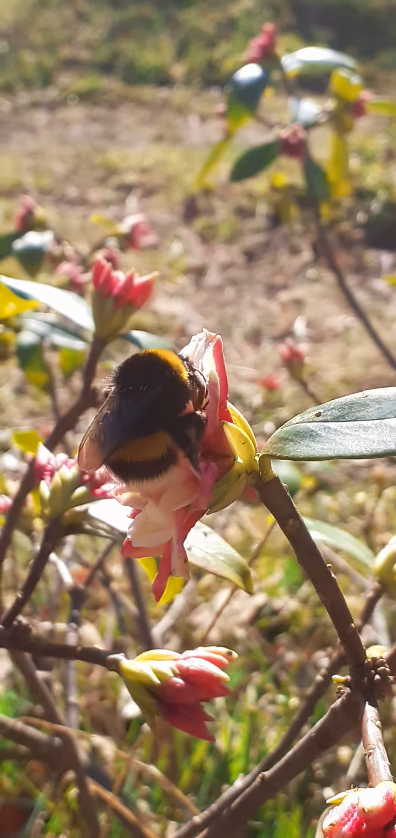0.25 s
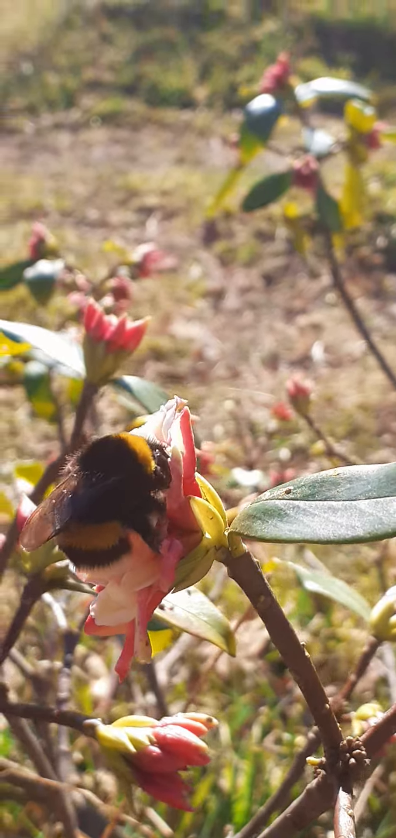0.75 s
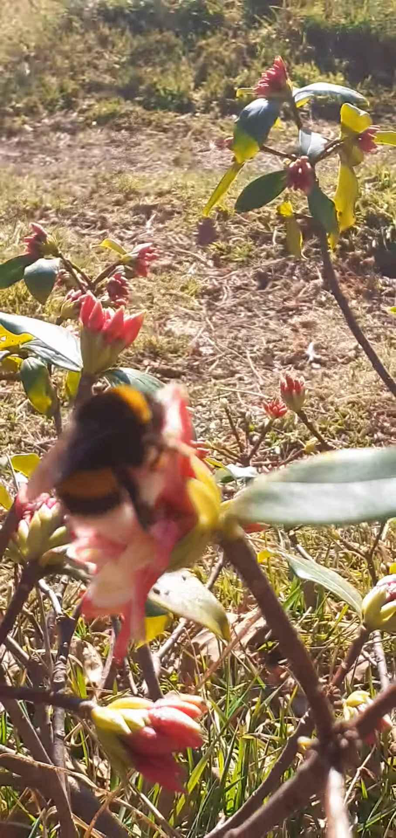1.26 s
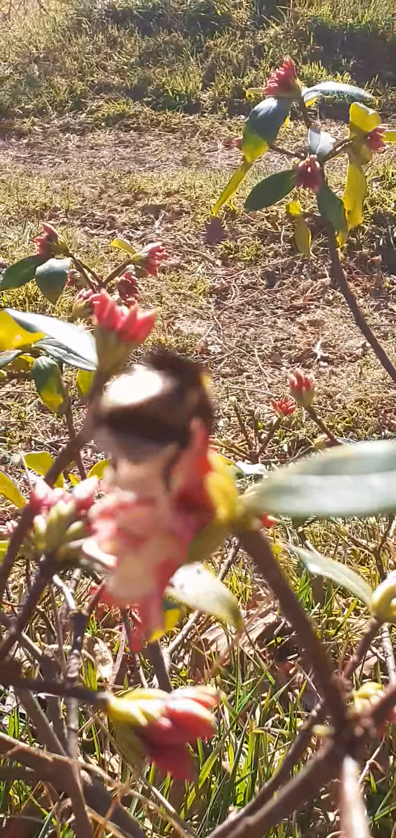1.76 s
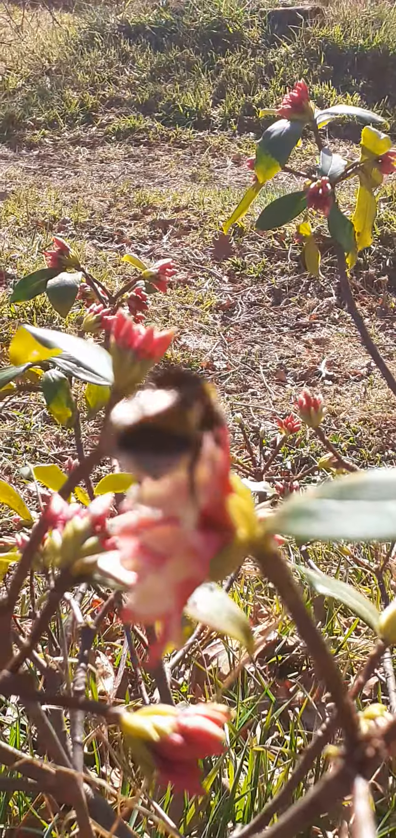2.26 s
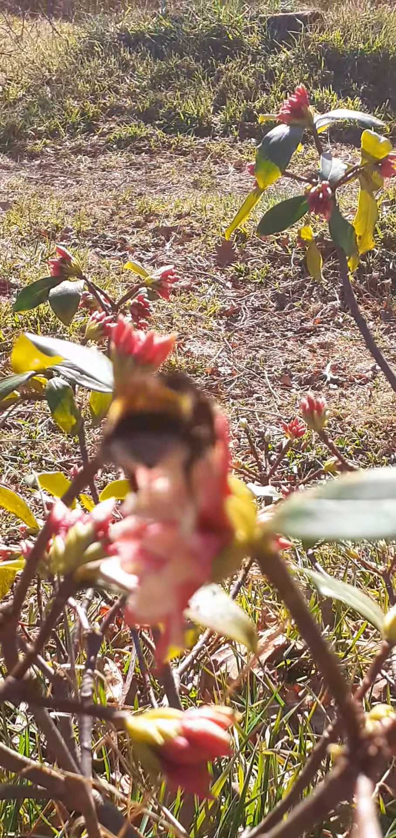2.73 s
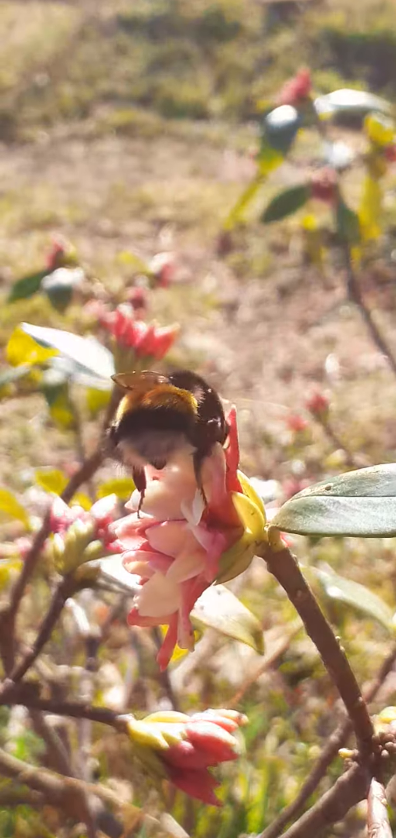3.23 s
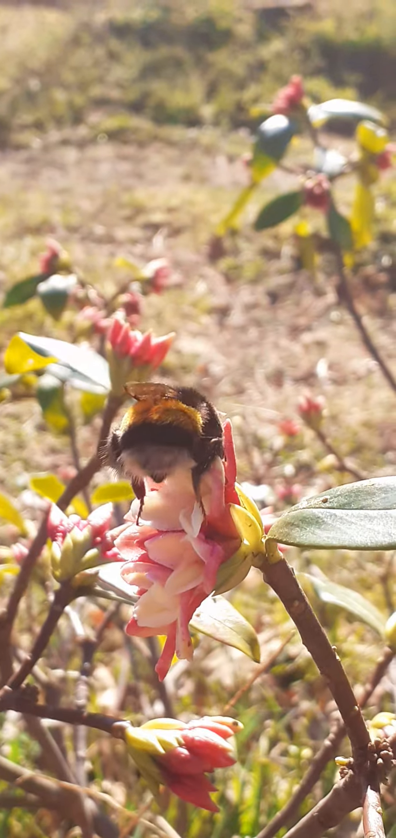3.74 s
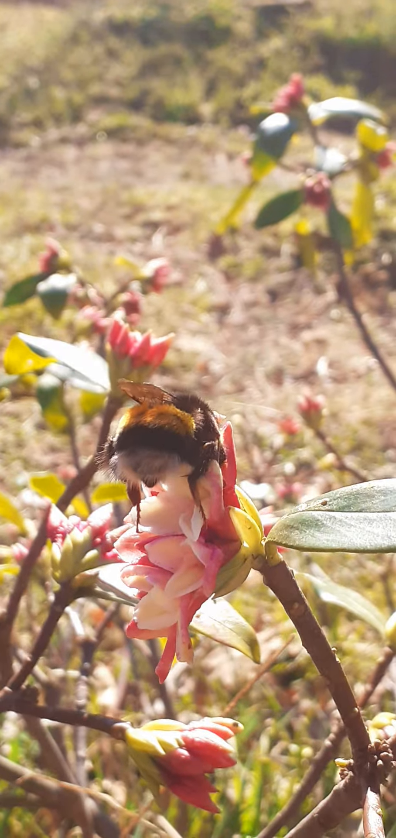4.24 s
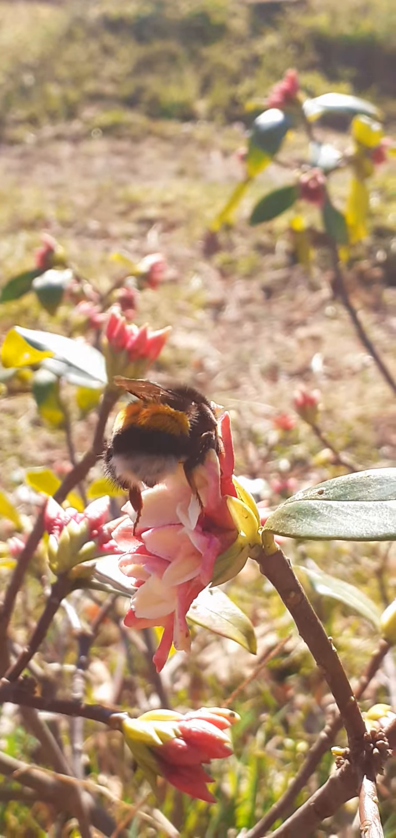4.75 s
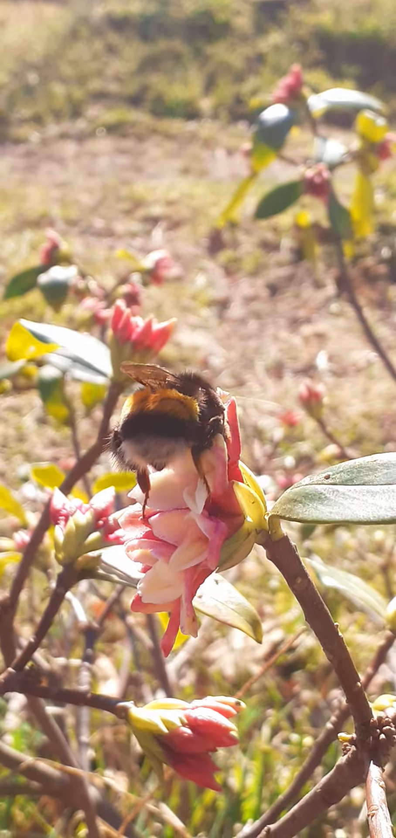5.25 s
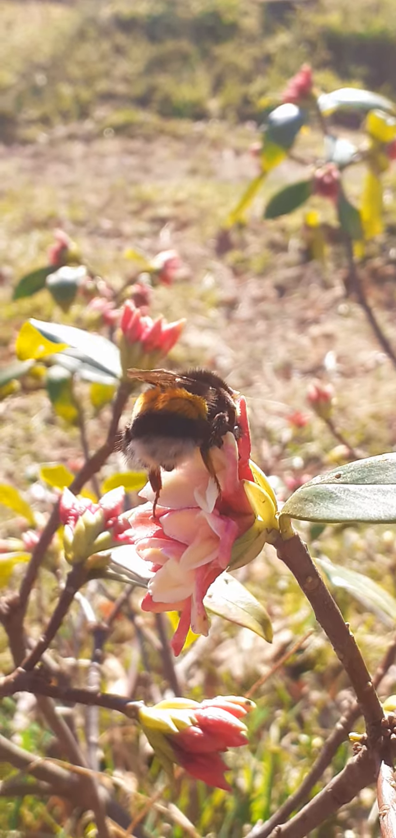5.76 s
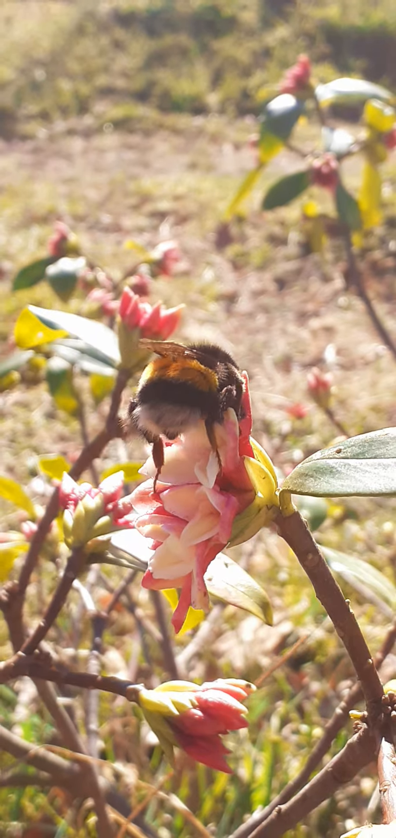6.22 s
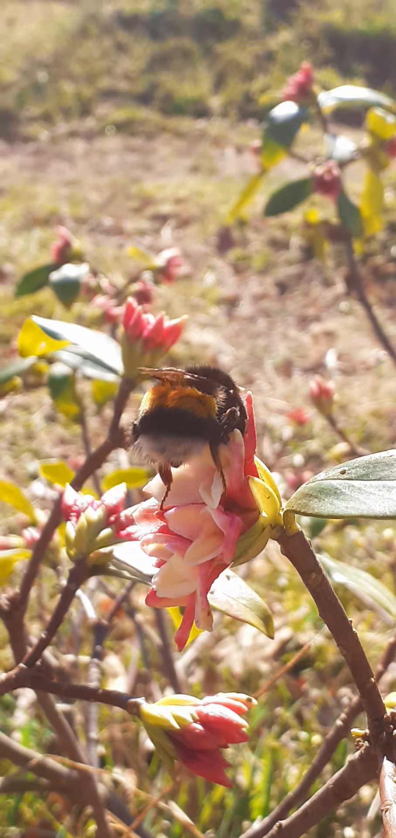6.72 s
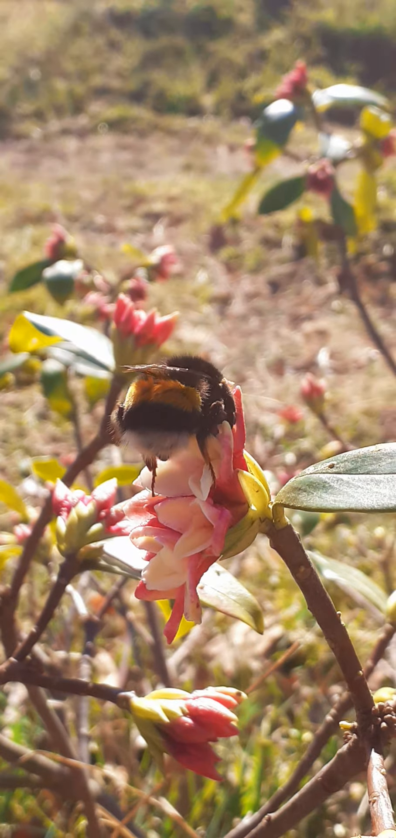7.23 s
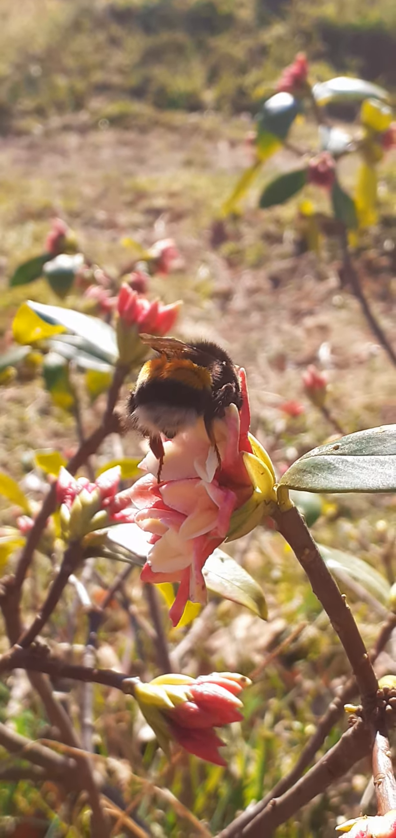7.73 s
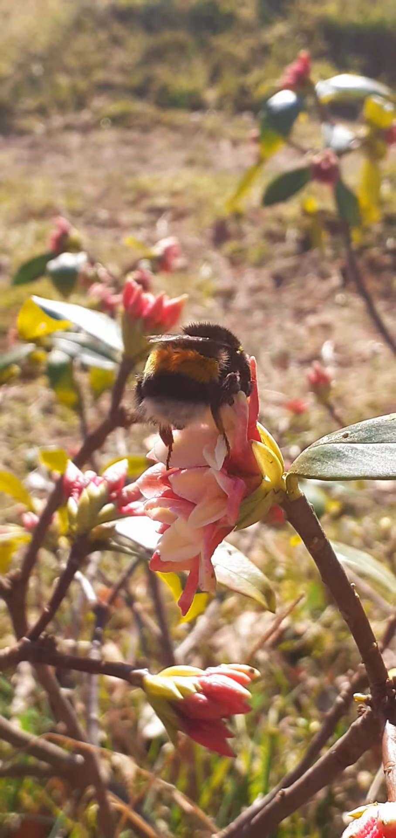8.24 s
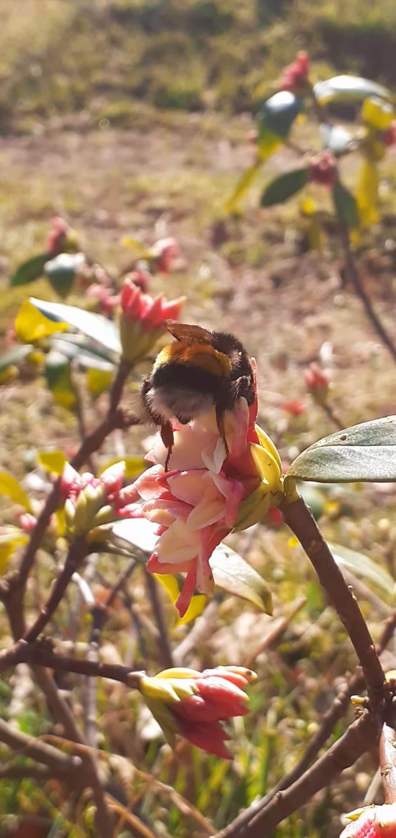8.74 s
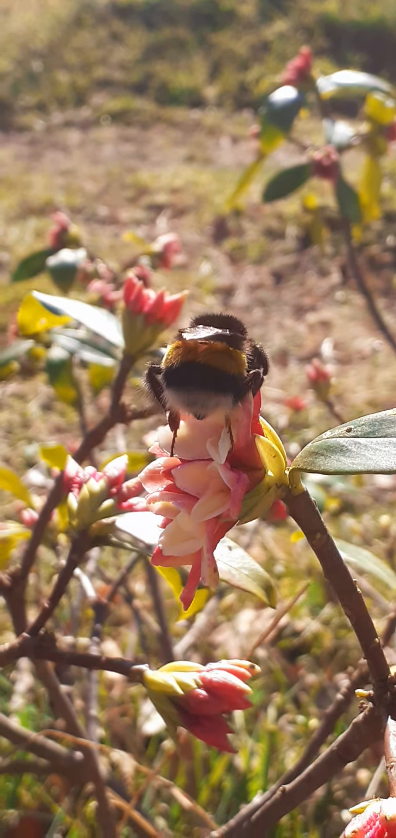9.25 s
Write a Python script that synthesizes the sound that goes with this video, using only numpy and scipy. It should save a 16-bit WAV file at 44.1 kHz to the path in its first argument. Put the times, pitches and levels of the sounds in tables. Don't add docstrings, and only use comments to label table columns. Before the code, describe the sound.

A phone is held close to a flower where a bumblebee feeds in an open garden. Soft microphone hiss and a subdued, distant low drone are present from the start. Sharp clicks strike the left microphone at about 0.2, 0.3, 0.5 and 0.8 seconds, the strongest near 0.5 and 0.8, each giving a short low, boxy ring. Around 1.3 a tiny leg tick on a petal and a faint puff are barely audible. Weaker knocks come at 2.4 and 2.6, with a soft leaf brush. From about 4 to 5 seconds the drone comes out from cover and swells, unsteady and throbbing, with hollow tones singing out at moments. A thin, fluttering whine emerges and sinks slightly in pitch, flaring near 5.2, 5.7, 7.5 and 8.4. Very faint brushes pass around 6 and 9. The drone eases slightly, then rises to its fullest after 9, stopping at about 9.5.

```python
import sys
import numpy as np
from scipy import signal
from scipy.fft import rfft, irfft, next_fast_len
from scipy.io import wavfile
from scipy.ndimage import uniform_filter1d

SR = 44100
rng = np.random.default_rng(int(sys.argv[2]) if len(sys.argv) > 2 else 0)


def volts_from_decibels(level):
    exponent = np.asarray(level, float) / 20
    return 10 ** exponent


def pcm_store(signal):
    levels = np.round(np.clip(np.atleast_2d(signal), -1, 1) * 32767)
    wavfile.write(sys.argv[1], SR, levels.astype(np.int16).T)


N = 418068
TIME = np.arange(N) / SR
SIZE = next_fast_len(N)
FREQ = np.maximum(np.arange(SIZE // 2 + 1) * SR / SIZE, 1)

REGION_HZ = (90, 190, 330, 650, 1500)
# pitch_hz, left_db_per_hz, right_db_per_hz
DRONE_COLOUR = [(25, -89.5, -84), (47, -66.5, -66.5), (70.8, -55.5, -55), (120, -50, -51),
                (173.7, -53, -52), (270, -57.5, -54.5), (325, -61, -55.5), (391.5, -67.5, -61.5),
                (500, -62, -74), (592, -65.5, -71), (748, -69.5, -72), (1160, -83.5, -85.5),
                (1704, -100.5, -91.5), (2066, -107.6, -103.7)]
# time_s, level_db
CARRY = [(0, -11.5), (.42, -7), (1.27, -8.5), (1.74, -8.5), (2.3, -5), (3.1, -3), (3.7, -3.5), (4.2, -5),
         (4.57, -2.5), (4.75, -0.5), (5.5, 0.5), (6.1, 0), (6.76, -1), (7.4, -1.5), (8.24, -2.5),
         (8.9, -1.5), (9.25, 6.5), (9.48, 6)]
CARRY_SHARES = (1.16, 1.08, 0.78, 1.07)
# middle_s, centre_hz, level_db, length_s
THROBS = [(0.092, 180, 1, 0.14), (0.268, 333, -0.5, 0.13), (1.283, 90, 6, 0.33), (2.05, 190, 2.5, 0.21),
          (2.55, 190, 0.5, 0.18), (3.028, 330, 3.5, .15), (3.19, 209, 2.5, 0.11), (3.765, 300, 3, 0.24),
          (4.3, 330, -3, 0.49), (4.426, 113, 6, 0.11), (5.36, 320, 2, .18), (5.86, 280, -10, 0.087),
          (5.87, 90, 4.5, 0.12), (6.08, 90, 6.5, 0.15), (6.763, 90, -0.5, 0.14), (7.355, 189, 3.5, 0.13),
          (7.842, 90.7, 5, 0.32), (8.022, 190, 4.5, 0.091), (8.004, 325, -8, .15), (8.53, 90.4, 7.5, 0.18),
          (8.557, 192, -4, 0.22), (8.91, 333, 5, .12), (9.324, 193, 4, 0.17), (9.211, 330, -5.5, 0.13),
          (1.25, 500, 5, 0.082), (6.447, 70.4, 5, .2), (8.6, 650, 1, 0.57), (9.425, 326, 9.5, .1),
          (9.423, 650, -2, .08), (9.45, 89.6, -2.5, 0.25)]
# pitch_hz, likeness (0-1), phase_rad
RIGHT_FOLLOWS_LEFT = [(60, 0.99, 0.01), (180, 1.0, -0.03), (250, 0.97, -0.25), (300, 0.87, -0.72),
                      (345, 0.55, -1.09), (400, 0.76, -1.44), (480, 0.53, -2.05), (560, 0.88, -0.77),
                      (700, 0.96, -0.83), (900, 0.91, -1.39), (1050, 0.74, -1.31), (1250, 0.17, -1.89),
                      (1600, 0.17, -0.5)]
# pitch_hz, width_hz, left_db, right_db
HOLLOWS = [
    (108, 12, -41, -41),
    (311, 9, -44, -42.5),
    (356, 14, -49, -58),
    (505, 12, -50.5, -63),
]
# middle_s, level_db, length_s
SINGING = [
    (3.1, 4, .25),
    (4.7, 7, .22),
    (5.3, 7, .14),
    (7.15, 5, .12),
    (8.35, 7, .22),
    (9.35, 4, .15),
]
# middle_s, level_db
FLARES = [
    (1.2, -2),
    (3.8, 7.5),
    (5.2, 6),
    (5.72, 5.5),
    (7.5, 5),
    (8.4, 7),
    (9.2, 8),
]
# start_s, size_db, softness_db (lost around 3.5 kHz)
JOLTS = [(.20997, -9.4, 3), (.21219, -9.4, 3), (.32070, -9.3, 0), (.47507, -1.5, 0), (.51090, -14.3, 0),
         (.51681, -.6, -1), (.55200, -15, -1), (.77541, -.5, 1), (2.38284, -19.5, 3.5), (2.63052, -24.5, 3),
         (2.63604, -14.5, 3)]
# pitch_hz, level_db
JOLT_RESPONSE = [(30, -44), (60, -5), (90, 0), (120, 4.2), (170, .6), (250, 4.8), (330, 9.9), (400, 3.5),
                 (1200, .4), (4000, -6.4), (7200, -13), (9200, -24), (12500, -6), (16000, -10)]
# start_s, level_db
TICK = (1.2828, -63)
# pitch_hz, fade_s (time to fall 60 dB), level_db
TICK_MODES = [
    (2600, .015, 0.5),
    (3900, .012, 1.5),
    (5800, .01, 0.5),
]
# middle_s, level_db, centre_hz, length_s
BRUSHES = [
    (.272, -67.5, 2350, .006),
    (.35, -78, 3500, .05),
    (1.297, -74, 4500, .015),
    (2.69, -75, 4200, .05),
    (6.12, -80, 3500, 0.11),
    (6.5, -80, 3500, .08),
    (9.098, -80, 4520, 0.23),
]
# pitch_hz, left_db_per_hz, right_db_per_hz
HISS_COLOUR = [(2000, -108, -104), (2500, -109, -105), (2900, -111, -114), (4200, -111.2, -111.7),
               (5550, -111.7, -113), (6730, -109.2, -112.5), (7200, -108.3, -110.2), (8570, -107, -107),
               (9600, -108.5, -113.6), (10100, -109.2, -117.4), (11300, -106.9, -115.5),
               (13000, -106.3, -114.8), (15500, -107.5, -113)]
# time_s, level_db
INPUT_GAIN = [(0, -6), (.28, .5), (.82, -2.5), (1.21, -2), (1.8, -4.5), (2.32, 0), (3.7, -.6), (6.18, 0.45),
              (9.48, -.4)]


def on_log(table, hz):
    rows = np.transpose(table)
    return np.array([np.interp(np.log(hz), np.log(rows[0]), c) for c in rows[1:]])


def on_time(table):
    rows = np.transpose(table)
    return np.array([np.interp(TIME, rows[0], c) for c in rows[1:]])


def shape(x, gain):
    return irfft(rfft(x, SIZE) * gain, SIZE)[..., :N]


def white(channels):
    return rng.standard_normal((channels, N)) * np.sqrt(SR / 2)


def walk(rate_hz):
    hold = int(SR / rate_hz)
    held = np.repeat(rng.standard_normal(N // hold + 1), hold)
    return 1.42 * uniform_filter1d(uniform_filter1d(held, hold), hold)[:N]


def bumps(times, length):
    coarse = TIME[::64]
    bells = np.exp(-((coarse - np.c_[times]) / np.c_[length]) ** 2)
    return np.repeat(bells, 64, axis=1)[:, :N]


def to_microphones(pair, gains):
    like, phase = on_log(RIGHT_FOLLOWS_LEFT, FREQ)
    like = np.clip(like, 0, 1)
    left, own = rfft(pair, SIZE)
    right = left * like * np.exp(1j * phase) + own * np.sqrt(1 - like ** 2)
    return irfft(np.array([left, right]) * gains, SIZE)[:, :N]


def cleared():
    return .5 + .5 * np.tanh((TIME - 4.53) / 0.41)


def swells():
    covered_db, open_db = -4, 1.5
    times, hz, db, length = np.transpose(THROBS)
    octaves_away = np.log2(np.array(REGION_HZ)[:-1, None] / hz)
    reach = np.exp(-(octaves_away / 0.45) ** 2)
    swell_db = np.outer(CARRY_SHARES, on_time(CARRY)) + (reach * db) @ bumps(times, length)
    swell_db[-1] += covered_db + (open_db - covered_db) * cleared()
    top_db = 0.22 * swell_db[-1]
    return np.vstack([swell_db, top_db])


def drone(swell_db, flicker_db=1.42, gust_db=0.5):
    lowest_hz = 25
    spectra, air, gust = rfft(white(channels=2), SIZE), 0, walk(9)
    for k in range(15):
        steps = 2 * np.log2(FREQ / lowest_hz) - k
        band = np.cos(np.pi / 2 * np.clip(steps, -1, 1)) ** 2
        centre_hz = lowest_hz * 2 ** (k / 2)
        place = np.interp(np.log(centre_hz), np.log(REGION_HZ), np.arange(len(REGION_HZ)))
        below = min(int(place), len(REGION_HZ) - 2)
        db = swell_db[below] + (place - below) * (swell_db[below + 1] - swell_db[below])
        level = volts_from_decibels(db + gust_db * gust + flicker_db * walk(14))
        air = air + level * irfft(spectra * band, SIZE)[:, :N]
    fall_db = -30 * np.log2(np.maximum(FREQ / DRONE_COLOUR[-1][0], 1))
    fall_db -= 12 * np.log2(np.maximum(DRONE_COLOUR[0][0] / FREQ, 1))
    dip_hz, dip_db, dip_octaves = 461, -2.5, 0.062
    fall_db += dip_db * np.exp(-(np.log2(FREQ / dip_hz) / dip_octaves) ** 2)
    return to_microphones(air, volts_from_decibels(on_log(DRONE_COLOUR, FREQ) + fall_db))


def hollows(swell_db):
    spectra, tones = rfft(white(channels=2), SIZE), 0
    times, sing_db, length = np.transpose(SINGING)
    sing_db = sing_db @ bumps(times, length) - 0.5
    regions, sing_shares = (0, 2, 2, 3), (0, 1, 0, .4)
    for (hz, width, *_), region, share in zip(HOLLOWS, regions, sing_shares):
        peak = np.exp(-.5 * ((FREQ - hz) / width * 2) ** 2) / np.sqrt(width)
        level = volts_from_decibels(swell_db[region] + share * sing_db + 1.3 * walk(1.5))
        tones = tones + irfft(spectra * peak, SIZE)[:, :N] * level
    sides = [(hz, left_db, right_db) for hz, _, left_db, right_db in HOLLOWS]
    return to_microphones(tones, volts_from_decibels(on_log(sides, FREQ)))


def whine(scatter=.72, under_db=-1.5):
    from_hz, to_hz, wobble_hz = 1127, 1099, 3.5
    gone = .5 + .5 * np.tanh((TIME - 5.9) / 1.9)
    pitch_hz = from_hz + (to_hz - from_hz) * gone + wobble_hz * walk(9)
    turn = np.exp(2j * np.pi * np.cumsum(pitch_hz) / SR)
    covered_db = -68
    open_db = -60.5 + 0.64 * (TIME - 4.53)
    db = covered_db + (open_db - covered_db) * cleared()
    times, flare_db = np.transpose(FLARES)
    db += flare_db @ bumps(times, [.1])
    shared = 1 + scatter * (walk(35) + 1j * walk(35))
    own = .35 * (walk(30) + 1j * walk(30))
    pan_db, phase_rad = -3, -1.3
    left = volts_from_decibels(pan_db / 2) * (shared + own) * turn
    right = volts_from_decibels(-pan_db / 2) * (shared - own) * turn * np.exp(1j * phase_rad)
    return volts_from_decibels(db + under_db) * np.real([left, right])


def jolts():
    times, size_db, soft_db = np.transpose(JOLTS)
    edge = np.exp(-np.log2(FREQ / 3500) ** 2)
    sizes = volts_from_decibels(size_db[:, None] - soft_db[:, None] * edge)
    kicks = (sizes * np.exp(-2j * np.pi * FREQ * times[:, None])).sum(axis=0)
    low_cut_db = -18 * np.log2(np.maximum(JOLT_RESPONSE[0][0] / FREQ, 1))
    cepstrum = irfft(np.log(volts_from_decibels(on_log(JOLT_RESPONSE, FREQ)[0] + low_cut_db)), SIZE)
    cepstrum[1:SIZE // 2] *= 2
    cepstrum[SIZE // 2 + 1:] = 0
    step = np.exp(rfft(cepstrum)) / (1 - np.exp(-2j * np.pi * FREQ / SR))
    rustle_db, rustle_hz, rustle_s = -48, 2500, .019
    after = np.maximum(TIME - times[:, None], 0) / rustle_s
    swell = (volts_from_decibels(.15 * size_db)[:, None] * after ** 2 * np.exp(-after)).max(axis=0)
    rustle = swell * shape(rng.standard_normal(N), 1 / (1 + (FREQ / rustle_hz) ** 2))
    return irfft(kicks * step, SIZE)[:N] + volts_from_decibels(rustle_db) * rustle


def tick():
    start_s, level_db = TICK
    after = np.maximum(TIME - start_s, 0)
    sound = 0
    for hz, fade_s, db in TICK_MODES:
        fade = np.exp(-np.log(1000) * after / fade_s)
        sound = sound + volts_from_decibels(level_db + db) * np.sin(2 * np.pi * hz * after) * fade
    return sound


def brushes(octaves=.45):
    spectra, out = rfft(rng.standard_normal((2, N)), SIZE), 0
    for s, db, hz, length in BRUSHES:
        width = octaves * min(length / .015, 1) ** 2
        band = np.exp(-(np.log2(FREQ / hz) / width) ** 2)
        noise = irfft(spectra * band / np.sqrt(np.mean(band ** 2)), SIZE)[:, :N]
        out = out + volts_from_decibels(db) * bumps([s], [length]) * noise
    return out


def hiss():
    return shape(white(channels=2), volts_from_decibels(on_log(HISS_COLOUR, FREQ))) * volts_from_decibels(on_time(INPUT_GAIN))


def scene():
    swell_db = swells()
    sound = drone(swell_db) + hollows(swell_db) + whine() + brushes() + hiss()
    tap = tick()
    return sound + np.array([jolts() + tap, 0.48 * tap])


def band_limit(x):
    return signal.sosfilt(signal.butter(12, 15800, fs=SR, output="sos"), x)


def record(dry):
    top_cut = np.clip((15800 - FREQ) / 300 + 1, 0, 1)
    mix = shape(dry, top_cut)
    return band_limit(mix)


dry = scene()
out = record(dry)
pcm_store(out)
```